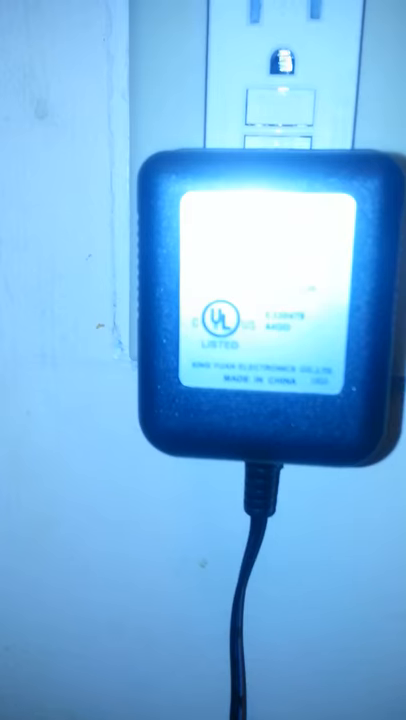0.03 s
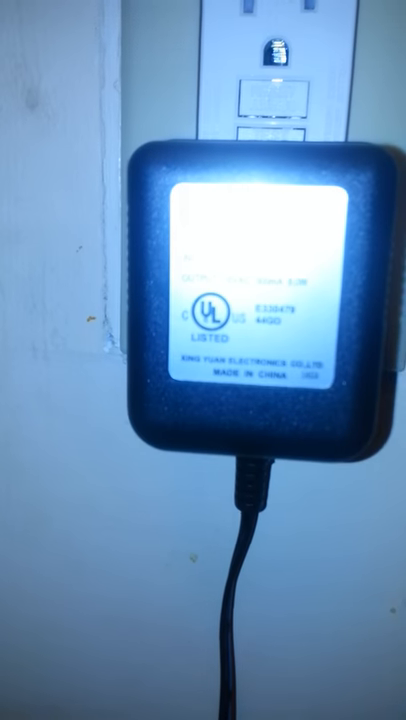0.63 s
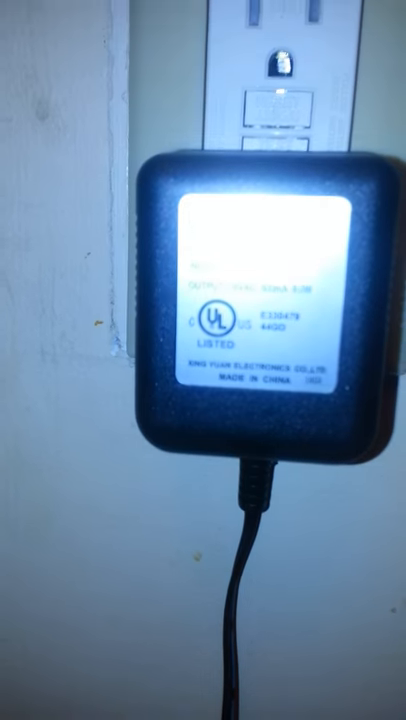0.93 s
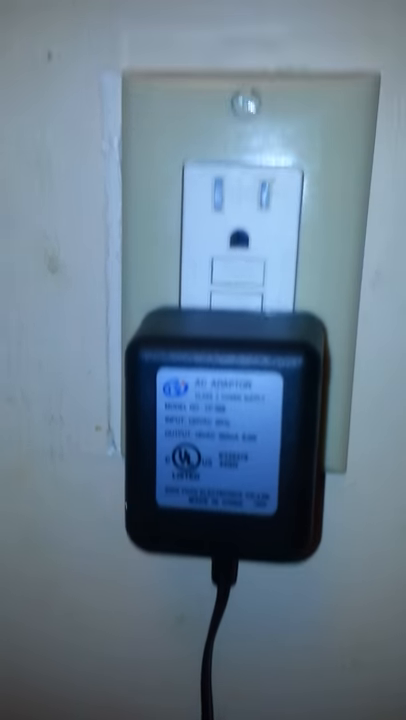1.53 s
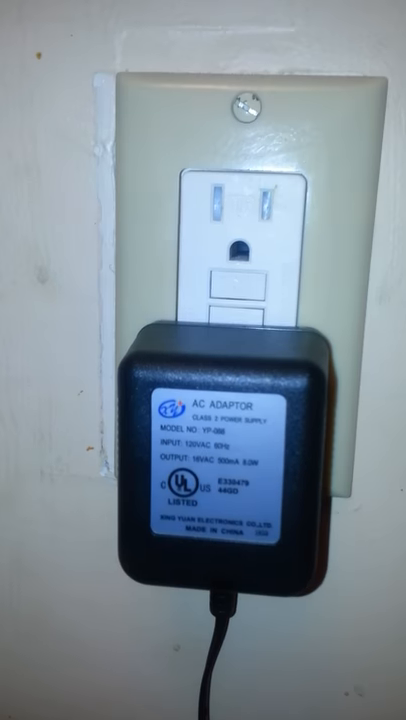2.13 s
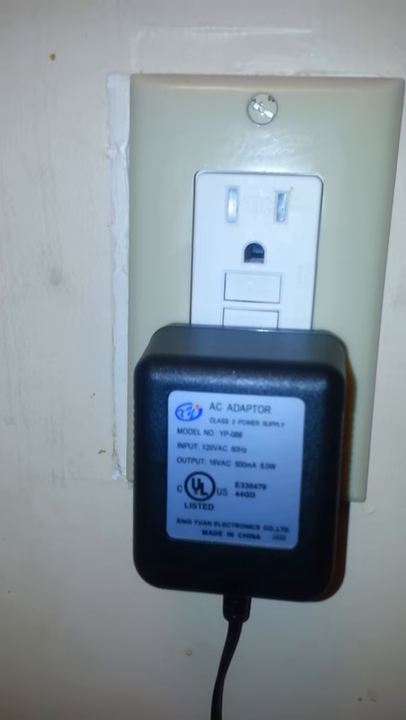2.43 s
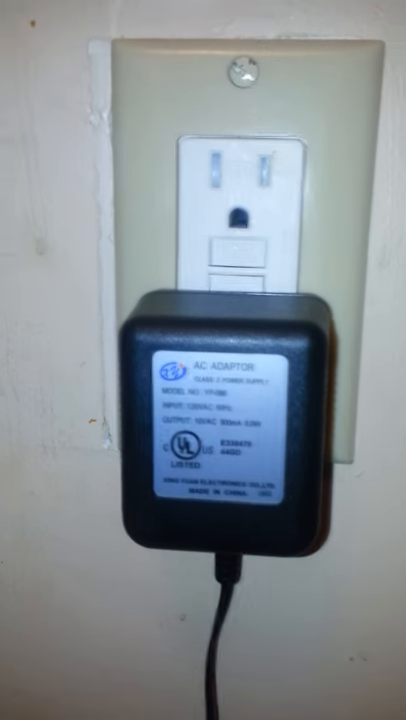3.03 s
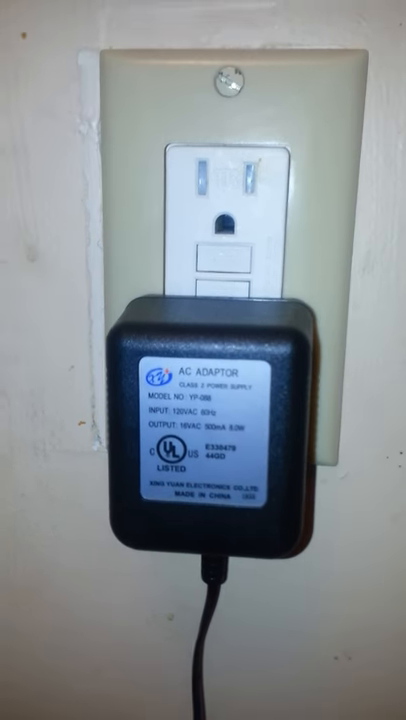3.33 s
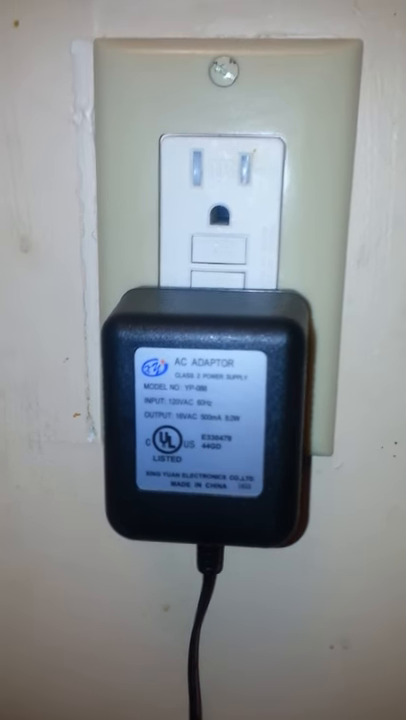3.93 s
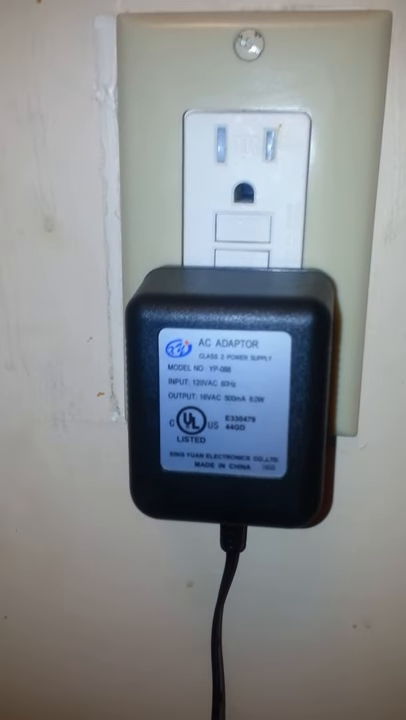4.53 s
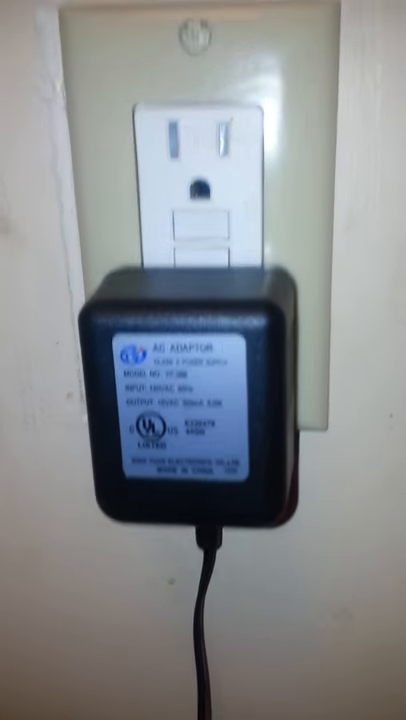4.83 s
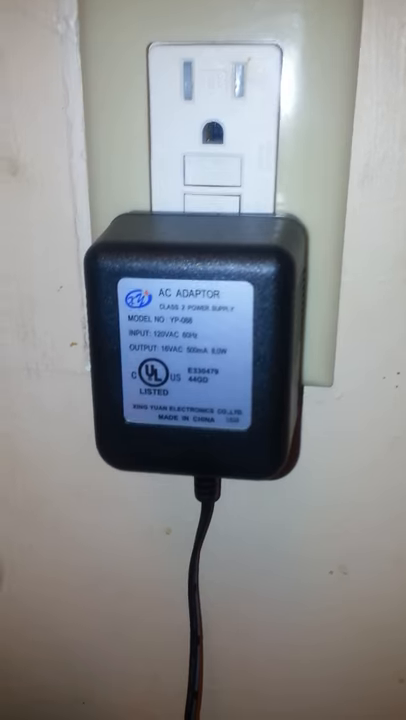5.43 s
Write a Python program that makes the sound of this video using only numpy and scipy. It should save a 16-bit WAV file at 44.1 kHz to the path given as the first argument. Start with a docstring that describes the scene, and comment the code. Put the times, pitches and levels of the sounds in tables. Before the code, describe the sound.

In a quiet room, a phone held close to a plug-in adapter picks up its constant electrical buzz, a thin high whine with a low hum beneath. A single pop comes just after the start. Later, fingers handle the phone right at the microphones: dull bumps on the right, clicks and skin rubbing on the left. The handling dies down and the buzz carries on, slightly weaker.

```python
"""A plug-in transformer adapter buzzes in a wall outlet, a hand's width from a phone in a quiet room.
Its loose core knocks twice per mains cycle and rings near 4.3 kHz; a soft hum lies underneath.
A hand comes up and reaches for it, reflecting the buzz. Fingers shift on the phone: thuds, clicks
and rubbing, right up against its two microphones. One pop sounds on the right near the start.
Behind it all is faint room tone: rumble, two low drones and hiss."""
import sys
import numpy as np
from scipy import signal
from scipy.fft import rfft, irfft
from scipy.io import wavfile

SR = 44100
rng = np.random.default_rng(int(sys.argv[2]) if len(sys.argv) > 2 else 0)


def put_to_file(sound):
    """Save the sound as 16-bit audio at rate SR, in the file named by the first command-line argument."""
    columns = np.atleast_2d(sound).T  # one column per channel
    safe = np.clip(columns, -1, 1)
    whole_steps = np.round(safe * 32767)
    wavfile.write(sys.argv[1], SR, whole_steps.astype(np.int16))


N = 250488
TIME = np.arange(N) / SR
FREQ = np.maximum(np.fft.rfftfreq(N, 1 / SR), 1)
MAINS_HZ = 60.01

# lower and upper modes of the phone's case: pitch_hz, width_hz, left_db, right_db
CLACK_MODES = [(770, 570, -2, 13.5), (1870, 540, 8, 7), (3520, 2800, -1.5, -13.5)]
TICK_MODES = [(5200, 660, 13, -26), (7900, 2100, 8.5, 5.5), (10100, 3700, -27, -2)]


def buzz(left_lag_s=.00008, whine_wet_db=-17, upper_wet_db=-7):
    """Close by, the knocks ring a strong whine and fainter upper modes; walls and a hand reflect them."""
    # modes of core and housing: pitch_hz, width_hz, left_db, right_db
    core_modes = [(2049, 35, -10, -28), (3705, 130, -15.5, -43), (4181, 47, 7, 4), (4133, 223.5, 8, -4.5),
                  (4397, 197, 10.5, -8), (5380, 760, -3.5, -18), (5595, 422, -2, -14.5),
                  (6400, 190, -10, -15), (6920, 930, -52, -16.5), (8800, 870, -26, -19),
                  (9950, 580, -17, -13), (10564, 250, -23.5, -11.5), (12160, 390, -25, -38),
                  (14000, 979, -53, -28.5)]
    # how strongly the buzz reaches the moving phone: time_s, whine_db, upper_db
    pickup = [(0, 1, 0), (1.25, 0.5, -2), (1.5, 0.5, 0.5), (2.1, 1.9, 1), (3.0, 0.5, 1.5),
              (3.9, -1.5, -2.5), (4.2, -3.5, -5.5), (5.68, -9, -5.5)]
    force = rfft(knocks()) * np.exp(-2j * np.pi * FREQ * np.array([[left_lag_s], [0]]))
    # neighbouring modes swing against each other, so the ring swells and beats
    modes = [(-1) ** k * undb([[left], [right]]) * resonance(hz, width)
             for k, (hz, width, left, right) in enumerate(core_modes)]
    whine_db, upper_db = curves(pickup)
    right_db = 0.4 + .4 * whine_db  # the right microphone faces away and follows only part of the change
    whine = irfft(force * sum(modes[:5]), N) * undb([whine_db, right_db])
    upper = irfft(force * sum(modes[5:]), N) * undb(upper_db)
    direct = whine + upper
    reflections = walls(undb(whine_wet_db) * whine + undb(upper_wet_db) * upper)
    return direct + sides(19) * hand_echo(direct[0]) + reflections


def knocks(scatter_db=.25, chatter_db=-28, chatter_s=0.0011, slip_s=.000039, settle_s=1.1):
    """The core knocks on each half cycle, unequally, and chatters for a moment after."""
    # the knocks within one mains cycle: start_s, level_db, slip_share
    knock_pair = [(.00094, -3.3, 0), (.009272, 0, 1)]
    start_s, level_db, slip_share = np.transpose(knock_pair)
    cycle_s = np.arange(int(N / SR * MAINS_HZ) + 1)[:, None] / MAINS_HZ
    # as the laminations settle, the stronger knock falls a little earlier
    early_s = slip_share * slip_s * (1 - np.exp(-cycle_s / settle_s))
    at = ((cycle_s + start_s - early_s) * SR).reshape(-1, 1)
    strength = undb(level_db + scatter_db * rng.standard_normal((len(cycle_s), 2))).reshape(-1, 1)
    # each knock falls between samples: a short windowed sinc
    taps = at.astype(int) + np.arange(-7, 9)
    pulse = np.sinc(taps - at) * np.cos(np.pi * (taps - at) / 16) ** 2
    force = np.bincount(taps.ravel(), (strength * pulse).ravel(), N)[:N]
    chatter = signal.lfilter([1], [1, -np.exp(-1 / (chatter_s * SR))], force) * rng.standard_normal(N)
    return force + undb(chatter_db) * chatter * force.std() / chatter.std()


def hand_echo(x, level_db=-8.5, far_path_m=.715, near_path_m=.472):
    """A hand comes up, then reaches for the adapter; the shrinking detour shifts its echo's phase."""
    raised = ramp(start_s=3.66, length_s=0.46)
    travel = np.sin(np.pi / 2 * ramp(start_s=4.9, length_s=.6) ** 1.6) ** 2  # speeds up, then stops
    path_m = far_path_m + (near_path_m - far_path_m) * travel
    return undb(level_db) * raised * np.interp(TIME - path_m / 343, TIME, x)


def walls(x, t60_s=0.025, gap_s=.002, drift_rad_per_s=1.12):
    """Dense early reflections at each microphone; their pattern shifts as the phone drifts."""
    echoes = rng.standard_normal((2, 2, N)) * undb(-60 * TIME / t60_s) * (TIME > gap_s)
    echoes /= np.sqrt(np.sum(echoes ** 2, axis=-1, keepdims=True))
    here, there = irfft(rfft(x) * rfft(echoes), N)
    drift = drift_rad_per_s * TIME
    return here * np.cos(drift) + there * np.sin(drift)


def hum(waver_db=0.5):
    """The core flexes smoothly at low even harmonics of the mains, wavering a little."""
    # tones of the flexing core: mains_multiple, left_db, right_db
    harmonics = [(2, -75, -86), (4, -62.5, -64.5), (6, -61, -64), (8, -65, -74)]
    out = 0
    for multiple, left, right in harmonics:
        tone = np.sqrt(2) * np.sin(2 * np.pi * (multiple * MAINS_HZ * TIME + rng.random()))
        out = out + undb([[left], [right]]) * tone * undb(-waver_db * flutter(rate_hz=1))
    return out


def thuds():
    """A fingertip pads on the right microphone port and jolts the case in proportion."""
    # fingertip contacts: start_s, pitch_hz, thud_db, tick_db
    touches = [ (3.2917, 112, -17.5, -26), (3.379, 317, -13, -5), (3.4382, 340, -14, -22),
               (3.4514, 320, -13.5, -24), (3.4776, 304, -14, -31), (3.5491, 403, -20.5, -19),
               (3.5927, 270, -22, -26), (3.6608, 300, -20.5, -19), (3.6756, 278, -23, -30),
               (3.917, 296, -25, -47), (3.9749, 374, -27.5, -47), (4.6530, 230, -20.5, -13.5),
               (4.6775, 368, -4, -22), (4.6852, 242, -19.5, -23), (4.7291, 340, -12.5, -24),
               (4.9446, 323, -11.5, -19), ]
    out = np.zeros((2, N))
    for start_s, hz, thud_db, tick_db in touches:
        thud = sides(-27) * undb(thud_db) * hollow(hz)
        jolt = sides(-12) * case(clack_db=thud_db - 20, tick_db=tick_db)
        add(out, start_s, thud + jolt)
    return out


def clicks():
    """The case gives under the grip with hard, slightly hollow clicks, mostly on the left."""
    # clicks of the case: start_s, hollow_hz, hollow_db, clack_db, tick_db, pan_db
    grips = [ (2.9712, 397, -39, -17, -45, 21), (2.9896, 1260, -15, -20, -44, 18),
             (3.0660, 1260, -25, -13.5, -19, 2), (3.072, 410, -35, -19, -12, 24),
             (3.2884, 264, -21.5, -17, -21.5, 4.5), (3.5548, 366, -31, -15, -14.5, 9.5),
             (3.6335, 400, -27.5, -30, -23, 12), (3.765, 520, -22, -2.5, -5.5, 28),
             (3.8878, 460, -16, -10.5, -9.5, 17), (4.198, 1270, -30.5, -45, -52, 14),
             (4.3765, 1170, -28, -38, -26.5, 14), (4.7104, 400, -46, -36, -12.5, -2), ]
    out = np.zeros((2, N))
    for start_s, hz, hollow_db, clack_db, tick_db, pan_db in grips:
        add(out, start_s, sides(pan_db) * (undb(hollow_db) * hollow(hz) + case(clack_db, tick_db)))
    return out


def hollow(hz):
    """A half-covered cavity: one heavily damped resonance and a second above it."""
    upper_hz = 1.7 * hz
    return ring([(hz, 0.73 * hz, 0), (upper_hz, 0.5 * upper_hz, -7)], grit=0.019, grit_s=0.0076)


def case(clack_db, tick_db, firm_hz=7000, softening=0.48):
    """The case clacks and ticks; a gentler contact lasts longer and sounds duller."""
    contact_hz = np.clip(firm_hz * undb(softening * clack_db), 500, SR / 3)
    clack = ring(CLACK_MODES, grit=.07, grit_s=.0009)
    clack = signal.sosfilt(signal.butter(2, contact_hz, fs=SR, output="sos"), clack)
    return undb(clack_db) * clack + undb(tick_db) * ring(TICK_MODES, grit=0.64, grit_s=0.00039)


def slide(grain_db=3, grain_hz=450):
    """Skin catches and slips on the case beside the left microphone."""
    # spectra of sliding skin, the dull rub and the bright hiss: frequency_hz, relative_db
    rub_spectrum = [(200, -15), (600, -9.5), (1200, -6), (1600, -3), (1950, -0.5), (2800, -10),
                    (6000, -12.5), (11000, -16.5), (14000, -54)]
    hiss_spectrum = [(400, -5.5), (2000, -16), (2800, -7), (3700, -9.5), (4700, 3), (5500, 1.5),
                     (6900, -14), (8000, -6.5), (9200, -14), (11000, -19.5), (14000, -21)]
    rub_colour, hiss_colour = colour(*np.transpose(rub_spectrum)), colour(*np.transpose(hiss_spectrum))
    rub, hiss = strokes()
    grip = undb(grain_db * flutter(grain_hz))
    ports = [rub * noise(rub_colour) + hiss * noise(hiss_colour) for _ in range(2)]
    return sides(17) * grip * np.array(ports) + snags(rub)


def strokes(lead_share=0.34):
    """Strength of rub and of hiss: each stroke takes hold partway up its rise, peaks and dies away."""
    # finger strokes, rise and fall spanning 20 dB: peak_s, rise_s, fall_s, rub_db, hiss_db
    swipes = [ (2.99, 0.096, .28, -44, -61), (3.3, 0.049, 0.11, -42, -49), (3.465, 0.12, 0.31, -38.5, -48),
              (3.68, 0.18, 0.13, -41.5, -26.5), (3.852, 0.43, 0.062, -36.5, -44), (4.35, .6, .5, -63, -58),
              (4.7, 0.12, 0.2, -43.5, -39.5), (4.84, 0.041, 0.037, -47.5, -42), (5.5, .4, 1.6, -51, -61), ]
    power = 0
    for peak_s, rise_s, fall_s, rub_db, hiss_db in swipes:
        away = np.maximum((peak_s - TIME) / rise_s, (TIME - peak_s) / fall_s)
        envelope = ramp(peak_s - lead_share * rise_s, 0.01) * undb(-20 * away)
        power = power + (undb([[rub_db], [hiss_db]]) * envelope) ** 2
    return np.sqrt(power)


def snags(rub, count=170, thud_db=6, clack_db=7, tick_db=2, scatter_db=3):
    """Sliding skin snags at random: tiny thuds on the right, clicks on the left, scaled by the rub."""
    out = np.zeros((2, N))
    times = (np.arange(count) + rng.random(count)) / count * TIME[-1]
    strengths = undb(scatter_db * rng.standard_normal((count, 2)))
    for start_s, (soft, hard) in zip(times, strengths):
        thud = sides(-14) * soft * undb(thud_db) * hollow(hz=370)
        clack = undb(clack_db) * ring(CLACK_MODES, grit=.07, grit_s=0.0011)
        tick = undb(tick_db) * ring(TICK_MODES, grit=0.45, grit_s=.0004)
        add(out, start_s, rub[int(start_s * SR)] * (thud + sides(12) * hard * (clack + tick)))
    return out


def pop(start_s=.3006, thump_db=-1, snap_db=-18):
    """One sharp pop on the right microphone: a sudden step that swings back to rest."""
    thump = undb(thump_db) * ring([(115, 180, 0)])
    snap = undb(snap_db) * ring([(9100, 9300, 0)])
    out = np.zeros((2, N))
    add(out, start_s, sides(-44) * (thump + snap))
    return out


def room(shared_below_hz=220):
    """Room tone: rumble and drones reach both microphones alike; the hiss is separate at each."""
    # steady room noise: frequency_hz, left_db_per_hz, right_db_per_hz
    noise_floor = [(25, -76, -99), (53, -96, -99), (78, -68.5, -70), (116, -71, -75.5), (195, -76, -82),
                   (337, -81, -84), (535, -85.5, -91), (1440, -88, -94), (3170, -93, -97.5),
                   (4470, -91, -86), (6800, -103, -91), (10700, -97.5, -95.5), (13600, -101, -101),
                   (14800, -104, -103)]
    # low drones in the room: pitch_hz, width_hz, level_db
    drone_bands = [(71.9, 11, -52.5), (144.45, 13.8, -53.5)]
    hz, *levels = np.transpose(noise_floor)
    common, *separate = rfft(rng.standard_normal((3, N)))
    share = .9 / (1 + (FREQ / shared_below_hz) ** 2)
    air = [colour(hz, db) * (np.sqrt(share) * common + np.sqrt(1 - share) * own)
           for db, own in zip(levels, separate)]
    drones = sum(undb(db) * noise(resonance(pitch, width) ** 2) for pitch, width, db in drone_bands)
    return irfft(np.array(air), N) * np.sqrt(SR / 2) + drones


def ring(modes, grit=0, grit_s=1, size=4096):
    """A contact with an optional gritty trail rings modes (pitch_hz, width_hz, levels in dB); peak 1."""
    freq = np.maximum(np.fft.rfftfreq(size, 1 / SR), 1)
    push = grit * rng.standard_normal((2, size)) * np.exp(-np.arange(size) / SR / grit_s)
    push[:, 0] = 1
    body = sum((-1) ** k * undb(db)[:, None] * resonance(hz, width, freq)
               for k, (hz, width, *db) in enumerate(modes))
    x = irfft(rfft(push) * body)
    return x / np.abs(x).max(axis=1, keepdims=True)


def resonance(hz, width_hz, freq=FREQ):
    """Response of one damped mode, gain 1 at its centre."""
    return 1 / (1 + 1j * (freq ** 2 - hz ** 2) / (freq * width_hz))


def colour(hz, db):
    """Gain at every frequency of a spectrum given by a few points."""
    return undb(np.interp(np.log(FREQ), np.log(hz), db))


def noise(response):
    """Noise of rms 1 with the given frequency response."""
    x = irfft(rfft(rng.standard_normal(N)) * response, N)
    return x / x.std()


def flutter(rate_hz):
    """A random wobble of spread 1, rolled off above the given rate."""
    return noise(1 / (1 + (FREQ / rate_hz) ** 4))


def curves(table):
    """The columns of a table, joined by straight lines in time."""
    time_s, *columns = np.transpose(table)
    return np.array([np.interp(TIME, time_s, column) for column in columns])


def ramp(start_s, length_s):
    """Rises from 0 to 1 over the given time and stays there."""
    return np.clip((TIME - start_s) / length_s, 0, 1)


def undb(db):
    """Decibels to gain."""
    return 10 ** (np.asarray(db) / 20)


def sides(pan_db):
    """Two gains, left minus right by pan_db: the nearer microphone gets the full level."""
    return undb(np.minimum([[pan_db], [-pan_db]], 0))


def add(out, start_s, hit):
    """Mix a short sound in at the given time."""
    start = int(start_s * SR)
    out[:, start:start + hit.shape[1]] += hit[:, :N - start]


def scene():
    """The adapter up close, the room behind it and handling noise on the phone."""
    return buzz() + hum() + room() + pop() + thuds() + clicks() + slide()


def record(dry, low_hz=42, edge_hz=14400, top_hz=16500):
    """The phone fades its input in, rolls off both ends of the range and clips at full scale."""
    fade = ramp(start_s=0.068, length_s=.102) ** 1.26
    x = signal.sosfilt(signal.butter(1, low_hz, "high", fs=SR, output="sos"), dry * fade)
    x = signal.sosfilt(signal.cheby1(8, .3, edge_hz, fs=SR, output="sos"), x)
    return signal.sosfilt(signal.ellip(8, .2, 70, top_hz, fs=SR, output="sos"), np.clip(x, -1, 1))


dry = scene()
out = record(dry)
put_to_file(out)
```